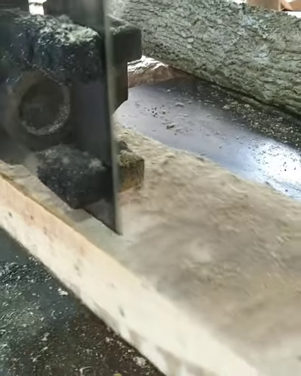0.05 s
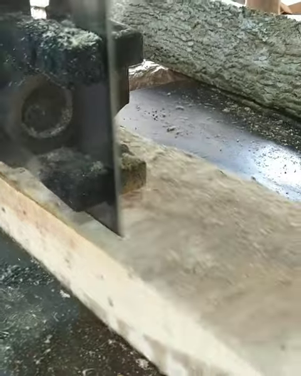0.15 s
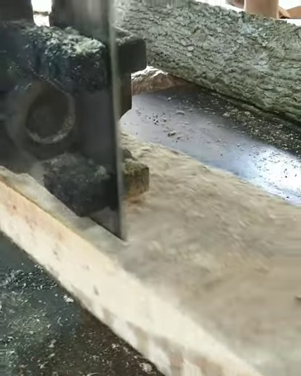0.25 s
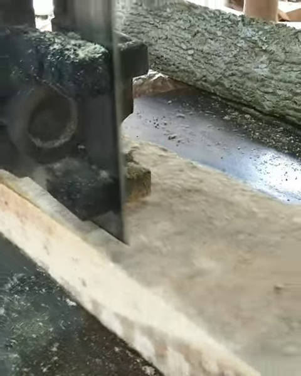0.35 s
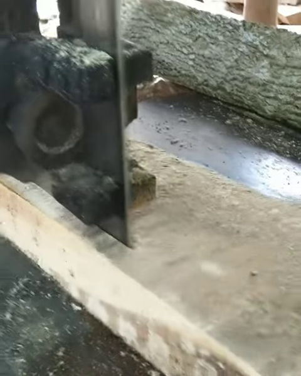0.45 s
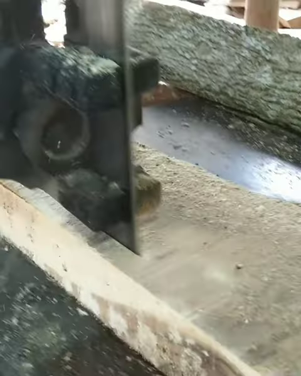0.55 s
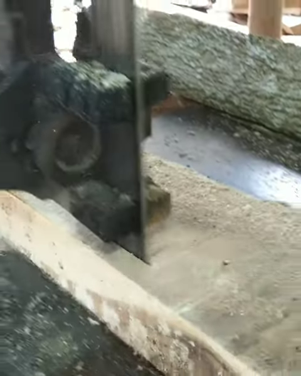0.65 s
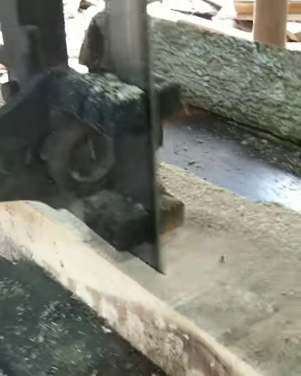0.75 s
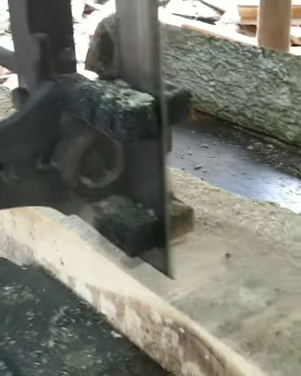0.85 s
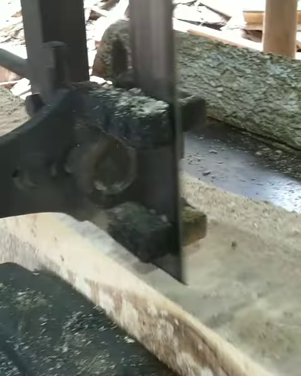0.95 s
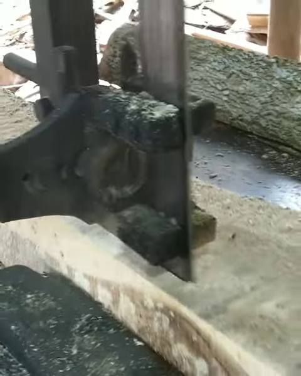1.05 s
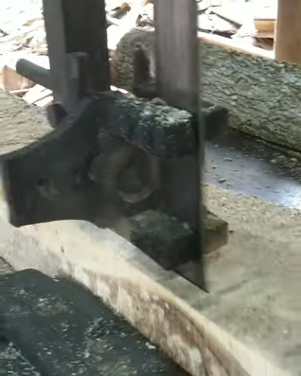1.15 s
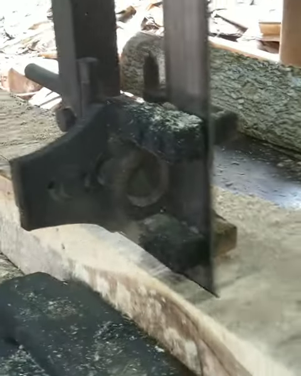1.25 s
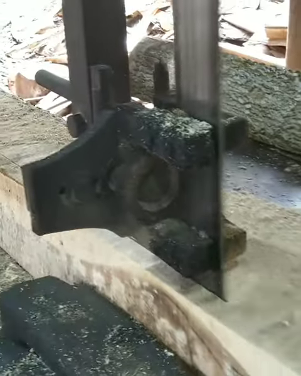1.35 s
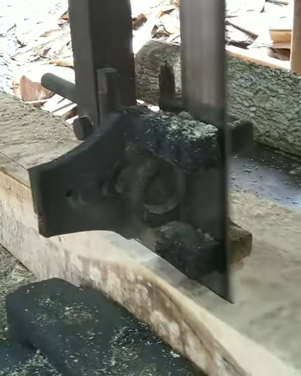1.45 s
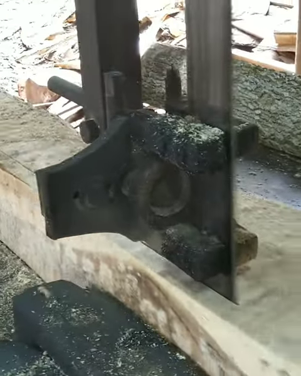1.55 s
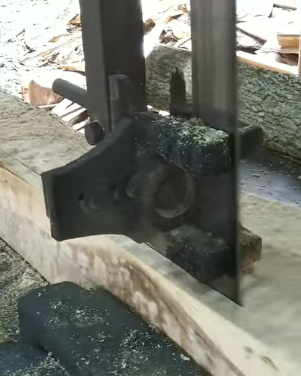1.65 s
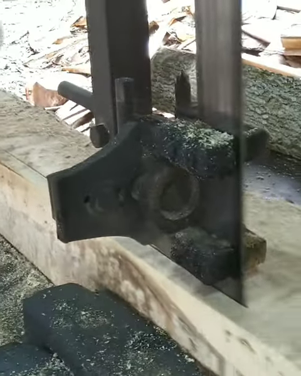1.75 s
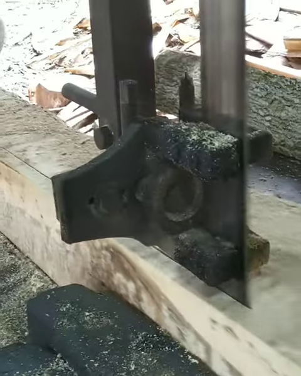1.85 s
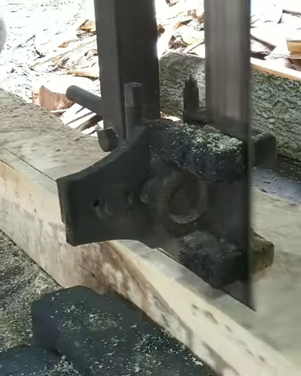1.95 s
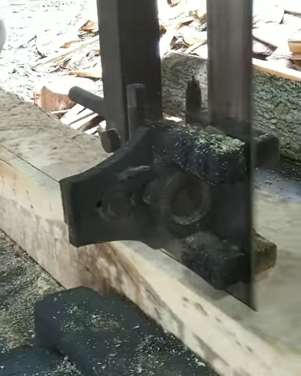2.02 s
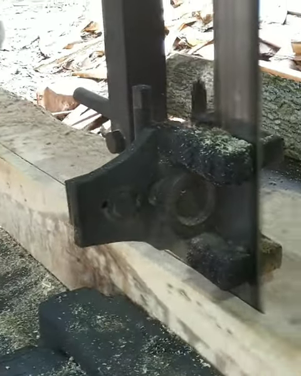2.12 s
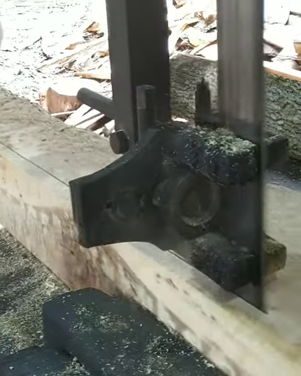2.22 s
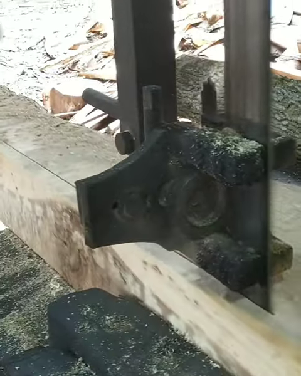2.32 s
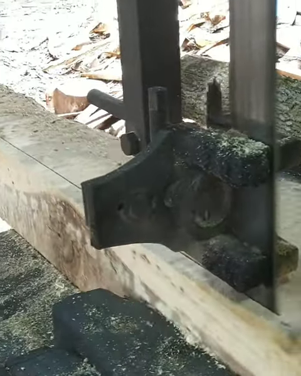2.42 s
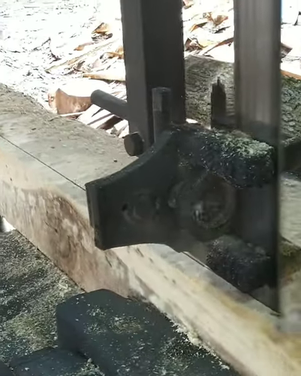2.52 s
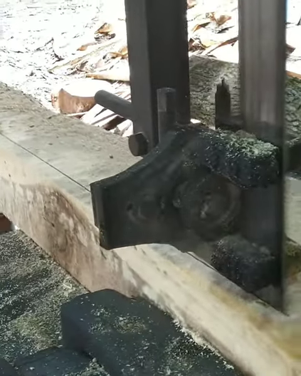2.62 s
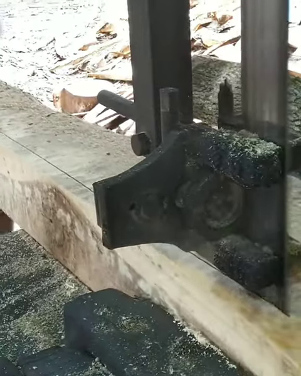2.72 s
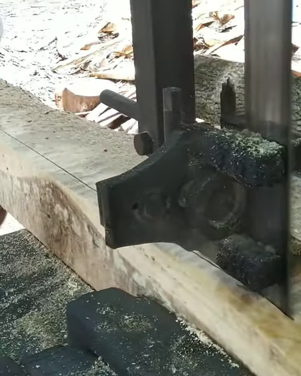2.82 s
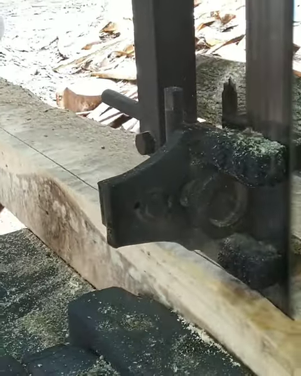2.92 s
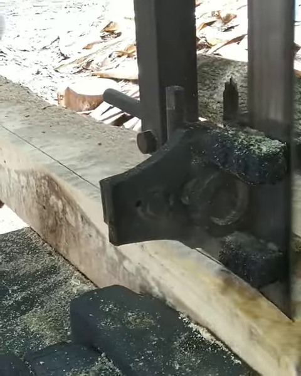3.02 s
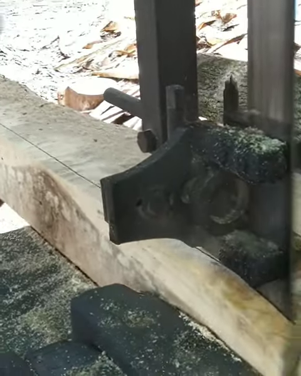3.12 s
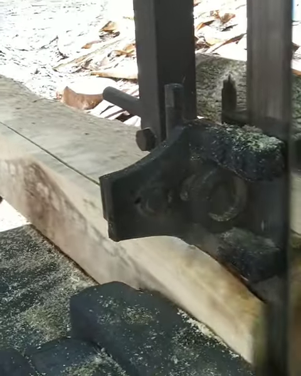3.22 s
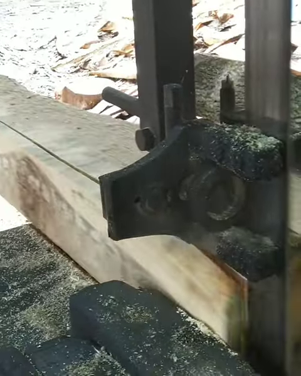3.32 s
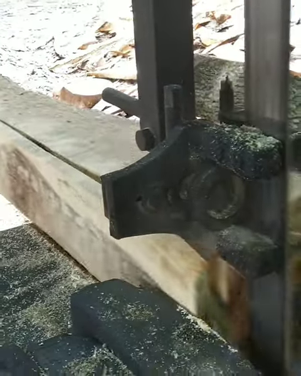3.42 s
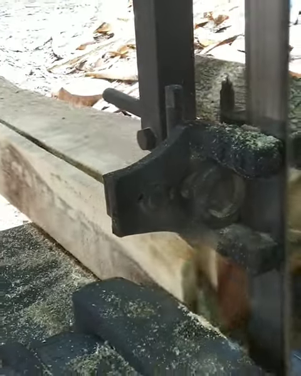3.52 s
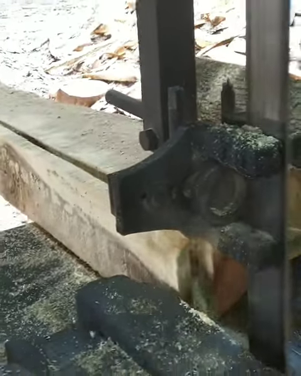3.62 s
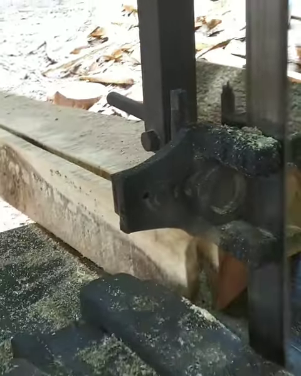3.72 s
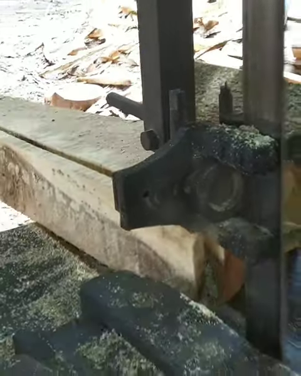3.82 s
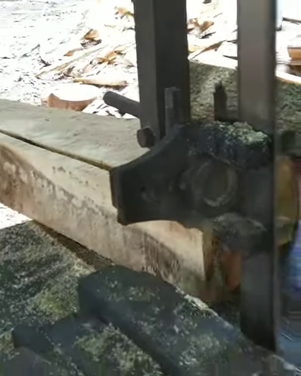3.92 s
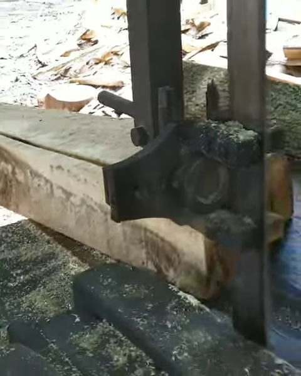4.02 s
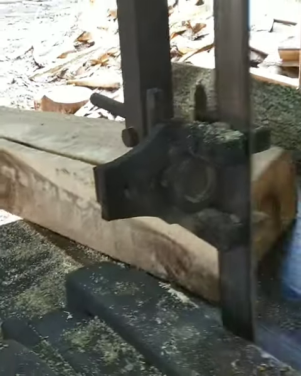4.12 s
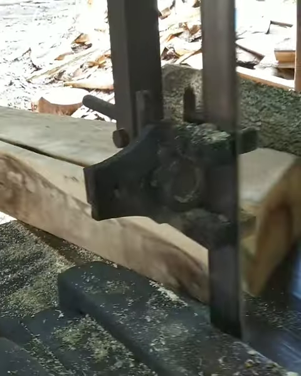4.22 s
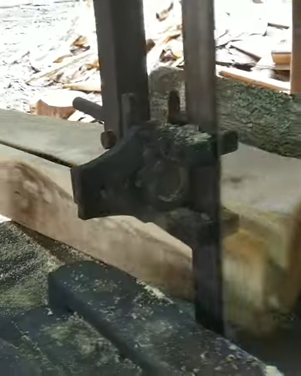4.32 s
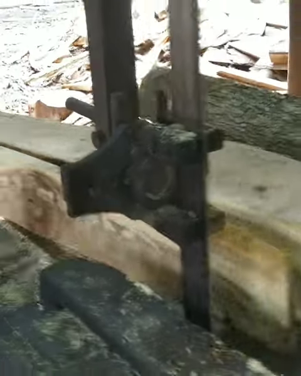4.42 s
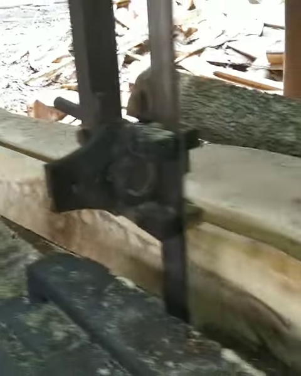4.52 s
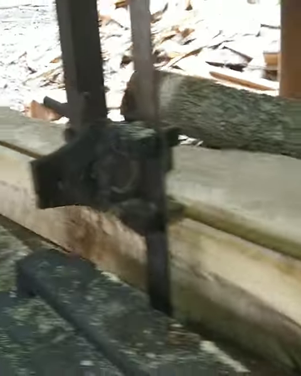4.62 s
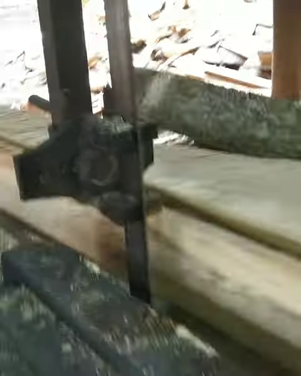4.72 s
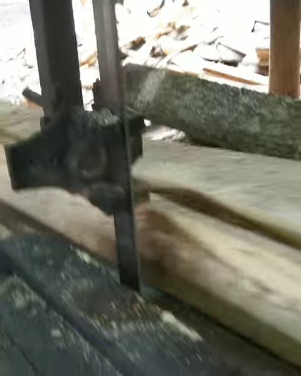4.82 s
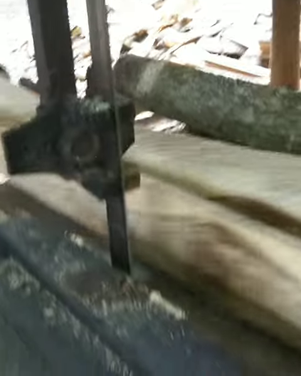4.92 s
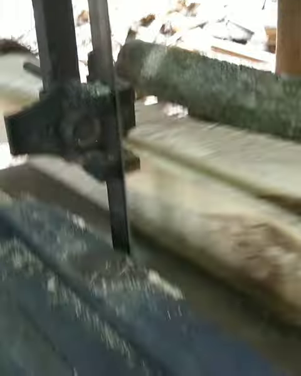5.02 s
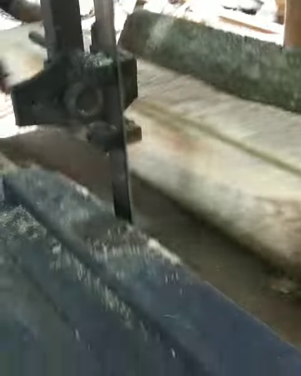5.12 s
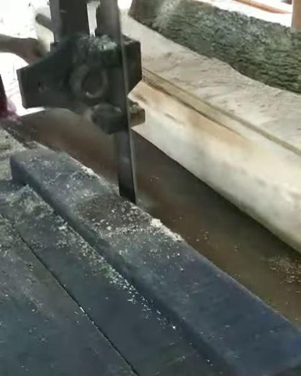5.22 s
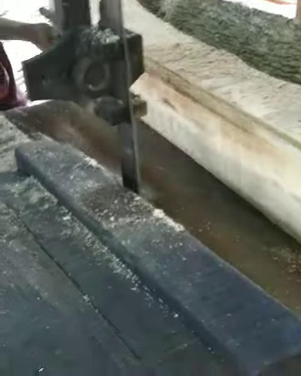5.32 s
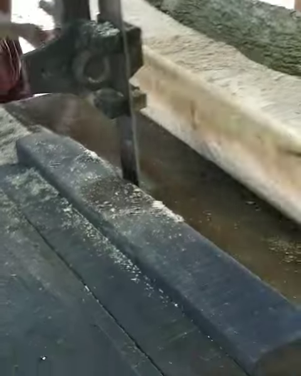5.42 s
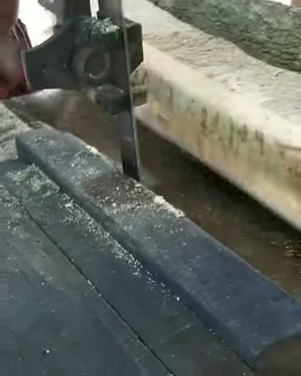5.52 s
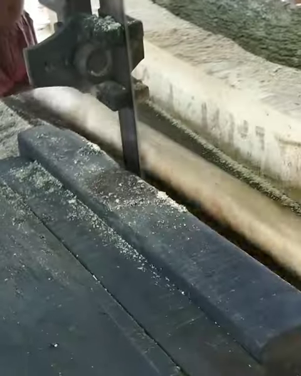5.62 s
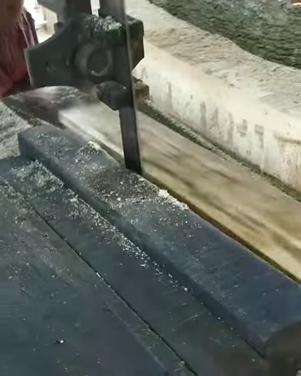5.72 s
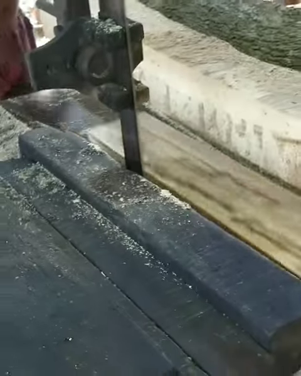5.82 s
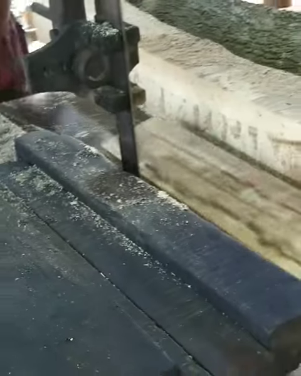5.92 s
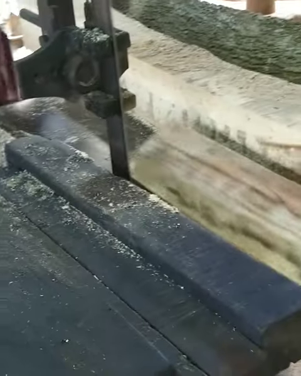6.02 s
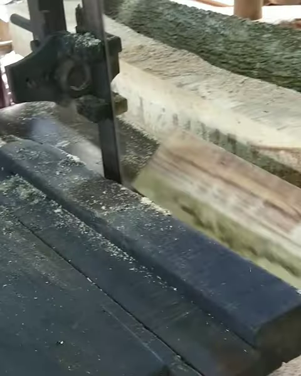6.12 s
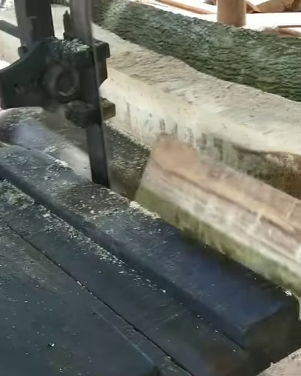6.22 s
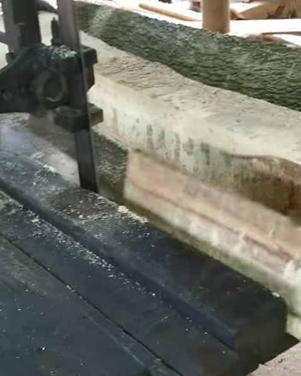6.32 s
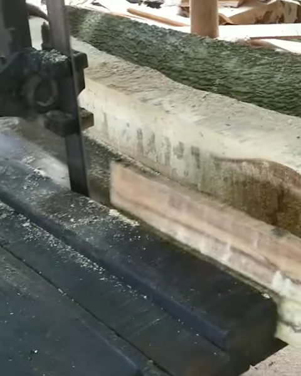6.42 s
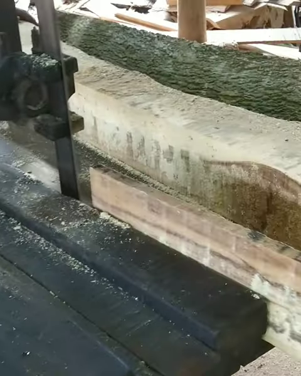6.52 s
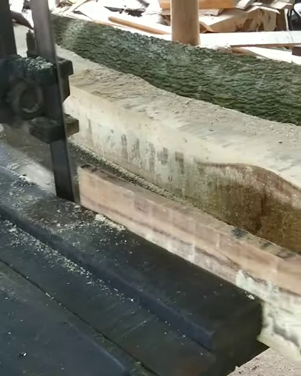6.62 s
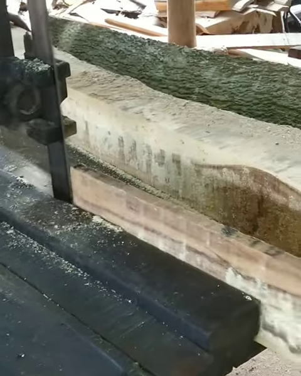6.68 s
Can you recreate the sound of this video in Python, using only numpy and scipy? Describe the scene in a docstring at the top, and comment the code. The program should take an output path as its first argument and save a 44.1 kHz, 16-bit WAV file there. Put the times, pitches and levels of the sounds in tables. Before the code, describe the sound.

Loud, hissing, screeching band saw finishes a cut through a log, air thumping the microphone, then the blade runs free with a steady whirr.

```python
"""First comes the hiss and screech of a big band saw finishing a cut through a log, close to a phone.
Patchy noise, shaped by resonances, makes the teeth and the log's drone; noise pushes and rolls are the air
and chips buffeting the microphone. The blade then leaves the wood and runs free over its wheels, as whirring
noise with thin whines, while the phone draws back. A brief bright scrape comes late.
The bass is mono; the right channel's treble drops out band by band."""
import sys
import numpy as np
from scipy import signal
from scipy.fft import rfft, irfft, next_fast_len
from scipy.io import wavfile
from scipy.ndimage import uniform_filter1d, map_coordinates

SR = 44100
rng = np.random.default_rng(int(sys.argv[2]) if len(sys.argv) > 2 else 0)


def output_pcm(signal):
    """Save a mono or channel-first signal as 16-bit PCM at the path in sys.argv[1].

    Samples are clipped to [-1, 1] before scaling.
    """
    pcm = np.clip(np.atleast_2d(signal).T, -1, 1) * 32767
    wavfile.write(sys.argv[1], SR, np.round(pcm).astype(np.int16))


N = 297675

# How loud the cut is, before its swings: time_s, tooth_hiss_db, log_drone_db
CUT_LEVELS = [(0, -15.5, -30.5), (.7, -17, -32), (1.15, -18, -25), (1.4, -18.5, -30.5), (1.7, -18, -28),
              (2.45, -18, -26), (2.7, -17.5, -26.5), (3.2, -19.5, -29.5)]
# How hard the air hits the microphone: time_s, strength_db
BUFFET_LEVELS = [(0, -23.5), (.9, -23), (1.1, -24), (1.3, -27.5), (1.43, -30.5), (1.5, -27), (1.75, -23.5),
                 (2.6, -25.5), (2.75, -29), (3.0, -30.5), (3.19, -28), (3.22, -42)]
# Broad colour of the teeth in wood: pitch_hz, level_db (per Hz)
TEETH_COLOUR = [(350, -11), (600, -4), (1000, -2.5), (1500, -5), (2400, -10), (3200, -3.5), (5000, -6),
                (6200, -8), (9500, -9), (11500, -3), (15000, -7.5)]
# Broad colour of the free blade: pitch_hz, level_db (per Hz)
WHIRR_COLOUR = [(30, -27), (60, -15), (110, -9.5), (250, -8), (400, -6), (600, -4.5), (1250, 0), (1900, -6),
                (2700, -6), (4500, -0.6), (5500, -6), (6400, -7), (9000, -10.5), (11500, -7), (15500, -9)]
# Broad colour of air on the microphone: pitch_hz, level_db (per Hz)
THUMP_COLOUR = [(22, -14), (35, -11), (55, -0.5), (100, -1.5), (200, -0.5), (350, -3), (550, -5), (900, -7),
                (1500, -20), (2500, -35), (5000, -48)]
# Resonances of the blade under load: pitch_hz, width_hz, lift_db
BLADE_MODES = [(3665, 80, 5.5), (3850, 520, 3.5), (4100, 87, 9), (4600, 86, 4), (6984, 244, 10),
               (7540, 580, 6), (8020, 400, 6), (13300, 1040, 8.5)]
# Resonances of the log: pitch_hz, width_hz, lift_db
LOG_MODES = [(940, 220, 4.5), (1350, 40, 0)]
# Resonances of the free blade in its guides (below 0 a dull spot): pitch_hz, width_hz, lift_db
GUIDE_MODES = [(888, 100, 2.5), (705, 50, 3), (1120, 70, 5), (1245, 90, -5), (1350, 45, 4), (1405, 50, 4),
               (1500, 90, 8), (520, 50, 4), (620, 50, 3), (1600, 60, 4), (1685, 50, 7), (1790, 80, 4),
               (2130, 350, 3), (2620, 250, -2.5), (3120, 200, 2), (3800, 300, 4), (5500, 800, 4.5),
               (6950, 300, 2.5), (7700, 900, 2), (10650, 400, -3), (11300, 800, 1.5), (13000, 900, 4.5)]
# Resonance of the motor: pitch_hz, width_hz, lift_db
MOTOR_MODES = [(159.4, 39, 11)]
# A short scrape of wood: centre_s, level_db, half_length_s
SCUFFS = [(5.732, -29.5, 0.0068)]
# Right port against left (below 0 dB loss it is louder): pitch_hz, likeness (0 to 1), loss_db
PORT_MATCH = [(370, 0.97, 0.5), (493, 0.93, 5.5), (610, 1, 3.5), (1100, 0.93, 1.5), (1470, 0.9, 2),
              (2000, 0.82, 2.5), (2900, 0.98, 2.5), (3250, 1, -1.5), (4500, 1, -0.5), (4670, 1, -0.27),
              (6350, 1, -0.5), (6600, 0.6, 1), (9300, 0.99, 0.5)]
# Right channel, middle bands: lower_edge_hz, mean_lag_rad, wander_rad, changes_per_s
MID_BANDS = [(432, 0.39, 0.68, 11), (545, 1.83, 1.3, 26), (792, 1.42, 1.13, 14), (1060, 0.96, 1.01, 14),
             (1288, 1.43, 0.94, 14), (1446, 2.74, 1.47, 9), (1772, 1.33, 1.2, 14), (2340, 1.98, 1.25, 14),
             (2713, 1.77, 1.47, 14)]
# The hardest pushes of air: start_s, nominal_peak_db, width_ms
HARD_PUSHES = [(0.002, -9, 0.36), (0.025, -10, 0.88), (0.0698, -4.5, 0.79), (0.0764, -7, 0.6),
               (0.114, -9, 0.36), (0.1412, -5.5, 0.6), (0.221, -8, 0.63), (0.2268, -7.5, 0.6),
               (0.2529, -14, 0.62), (0.261, -17, 0.5), (0.2944, -11, 0.7), (0.3617, -7.5, 0.61),
               (0.4066, -8, 0.53), (0.4131, -4.5, 0.42), (0.4183, -8, 0.46), (0.4369, -9.5, 0.45),
               (0.55, -10, 0.8), (0.5601, -8, 0.81), (0.5685, -9, 0.7), (0.5757, -9, 0.5),
               (0.6357, -12.5, 0.48), (0.6528, -9, 0.64), (0.6606, -9, 0.37), (0.6718, -9.0, 0.6),
               (0.681, -8, 0.4), (0.688, -6, 0.6), (0.701, -6, 0.35), (0.7224, -9, 0.54), (0.7434, -8, 0.9),
               (0.7581, -10, 0.46), (0.7808, -8, 0.36), (0.8026, -7.5, 0.57), (0.8115, -8.5, 0.64),
               (0.8721, -9, 1.1), (0.8787, -9.5, 1.2), (0.8856, -10, 0.7), (0.9751, -9, 0.7),
               (0.9865, -12.0, 0.5), (0.9926, -10, 0.6), (1.0197, -3, 0.45), (1.0595, -13, 0.34),
               (1.085, -6, 0.7), (1.1082, -6, 0.84), (1.1595, -9, 0.4), (1.2026, -8, 0.37),
               (1.258, -8, 0.44), (1.5323, -9.5, 0.53), (1.5815, -7, 0.6), (1.6337, -8.5, 0.83),
               (1.671, -10, 0.76), (1.6833, -8, 0.43), (1.688, -10, 0.41), (1.7117, -8, 0.45),
               (1.7176, -5.5, 1.1), (1.7376, -7, 0.5), (1.7444, -5, 0.62), (1.784, -7, 0.8), (1.8, -9, 0.7),
               (1.8245, -6, 0.4), (1.8883, -8, 0.5), (1.9168, -9, 0.57), (1.926, -4.5, 0.6),
               (1.9553, -6, 0.59), (2.0039, -11.0, 0.6), (2.0161, -10, 0.4), (2.0273, -14, 0.7),
               (2.08, -14, 0.67), (2.1214, -9.5, 1.6), (2.1431, -12, 0.65), (2.1548, -14, 0.32),
               (2.1872, -7, 0.39), (2.1973, -10.5, 0.55), (2.2682, -9, 0.46), (2.3377, -10.5, 0.36),
               (2.3626, -9, 0.5), (2.4161, -8.5, 0.47), (2.4245, -4.5, 0.61), (2.435, -12.0, 0.54),
               (2.5692, -7, 0.31), (2.5743, -9, 0.55), (2.5871, -9, 0.8), (2.6236, -11, 0.46),
               (2.7913, -7, 0.76), (2.946, -11, 0.95), (3.0328, -9, 1.2), (3.1438, -10, 0.55),
               (3.1712, -8, 0.52), (3.1776, -7, 0.67)]
# The air lets go for a moment: centre_s, depth_db, half_length_s
AIR_LULLS = [(0.051, 15, 0.0075), (0.091, 13, 0.0048), (0.282, 14, 0.0089), (0.428, 21, 0.0036),
             (0.466, 8, 0.0061), (0.506, 8, 0.019), (0.604, 9.5, 0.017), (0.733, 5, 0.0049),
             (0.957, 10, 0.014), (1.074, 6, .005), (1.184, 8, 0.0088), (1.378, 22, 0.0055),
             (1.52, 9, 0.0084), (1.647, 12, 0.012), (1.755, 16, 0.0052), (1.869, 6, 0.0065),
             (2.069, 9, 0.0091), (2.101, 11, 0.0098), (2.168, 3.5, 0.0064), (2.32, 8, 0.0059),
             (2.396, 6, 0.0052), (2.666, 7, 0.018), (2.779, 8, 0.0054), (2.883, 17, 0.011),
             (3.012, 28, 0.02), (3.114, 3.5, 0.051), (3.158, 4, 0.0058)]
# The low rolls swell, or sink where below 0: centre_s, change_db, half_length_s
ROLL_SWELLS = [(0.226, 2, 0.03), (0.883, 3, 0.014), (0.986, 1, 0.019), (1.113, -1, 0.017),
               (1.316, 8.5, 0.035), (1.742, 2, 0.027), (1.984, 4, 0.024), (2.257, 2, 0.027),
               (2.627, 6, 0.049), (2.818, 9.5, 0.026), (3.037, -1.5, 0.022)]
# The phone draws back: time_s, change_db
PHONE_RETREAT = [(3.3, -0.5), (4.3, -1.7), (5.4, -7), (6.75, -7.5)]
# Right channel, treble bands: lower_edge_hz, loss_db, flicker_db, fade_start_s, fade_length_s, first_lag_rad
TREBLE_BANDS = [(3080, 3, 0.5, 3.42, 0.13, 2.5), (4613, 0, 0.55, 3.4, 0.2, 0),
                (6357, 11, 4, 3.53, .22, 1.5), (8150, 0, 2, 1.58, 0.57, 1.86)]
# Swells of loss, one list per treble band (below 0 the band gets louder): centre_s, extra_loss_db, half_length_s
LOSS_SWELLS = [
    [(.1, 30, 0.032), (.27, 14, 0.032), (.39, 21, 0.033), (.66, 22, 0.036)],
    [(.2, 5.5, 0.83), (.63, 40, 0.095), (1.6, 13, 0.14)],
    [(1.42, -7, 0.025), (2.2, 16, .03), (2.72, 12, .03), (3.12, -3, 0.035)],
    [(.02, 33, 0.059), (.38, 10, 0.088), (.47, 28, 0.035), (1.36, 15.5, 0.048)],
]
# Moves of the lag, one list per treble band: from_s, to_s, move_rad
LAG_MOVES = [
    [(.75, 1.15, -1)],
    [(.45, .75, 4.2), (1.15, 1.7, np.pi - 4.2)],
    [(.3, .75, 3.3)],
    [(.45, .6, -1.7), (.9, 1.1, -1.8), (1.18, 1.22, -1.4), (1.29, 1.33, -1.4)],
]
# Small eddies bunch up: centre_s, lift_db, half_length_s
SMALL_EDDIES = [(2.574, 2, 0.0095), (2.63, 5, .01), (2.8, 9.5, 0.015), (2.915, 7, 0.0072),
                (2.946, 4, 0.0078), (3.033, 4, 0.0098), (3.138, 10.5, 0.0082), (3.177, 5.5, 0.0077)]
# Thin whine of the free blade: time_s, pitch_hz, level_db
HIGH_WHINE = [(3.2, 1355, -35.5), (3.7, 1365, -38), (4.2, 1375, -42.5), (4.6, 1410, -41.5),
              (5.1, 1400, -44), (5.7, 1375, -39.5), (6.1, 1395, -43.5), (6.75, 1380, -47)]
# Lower thin tone of the free blade: time_s, pitch_hz, level_db
LOW_WHINE = [(3.3, 900, -50), (4.2, 862, -43.5), (4.9, 879, -52), (5.5, 909, -45), (6.2, 900, -47),
             (6.75, 885, -54)]

OUT_S, BREAK_S = 3.235, 0.023  # the blade is out of the wood; how long breaking out takes
LULL_IN_DRONE = 0.66  # share of a lull that also hushes the log
ROLL_DB, PUSH_DB = -2.5, -2.5  # slow rolls, and quick pushes between flurries
REBOUND = 4.4  # the swing back lasts this many times longer than the push
WHEEL_HZ = 13.2  # wheel turns a second
WHIRR_DB, FRAME_DB, RING_DB, MOTOR_DB = -29.5, -38, -34, -47.5  # before the retreat and swings
FRAME_FALLS, RING_FALLS, MOTOR_FALLS = 0.81, 0.77, 0.22  # share of the retreat; low sound fills the shed
RING_SETTLES_DB, RING_SETTLES_S = 3, 0.74  # the freed blade rings harder at first
WHINE_WIDTH_HZ = 40
MONO_HZ = 330  # both ports hear the same below this
SILENT_DB = 31  # a treble band that loses this much is gone
TREBLE_END_HZ, TOP_HZ = 13000, 15740  # upper limits of the right channel and of the whole sound


def amp(db):
    """Turn decibels into gain."""
    return 10 ** (np.asarray(db) / 20)


def unit(x):
    """Scale to an rms level of 1."""
    return x / np.sqrt(np.mean(x ** 2) + 1e-20)


def along(points, hz):
    """Read each column after the pitch, on a log pitch axis."""
    f, *cols = np.transpose(points)
    return [np.interp(np.log(hz + 1), np.log(f + 1), c) for c in cols]


def curves(rows):
    """Give one value per sample for each column after the time."""
    s, *cols = np.transpose(rows)
    return [np.interp(np.arange(N) / SR, s, c) for c in cols]


def wobble(rate):
    """A smooth random curve through rate random points a second."""
    points = rng.standard_normal(int(N * rate / SR) + 4)
    return map_coordinates(points, [np.arange(N) * rate / SR])


def bumps(rows):
    """Bell-shaped swells from rows of centre_s, height, half_length_s."""
    t = np.arange(N) / SR
    return sum(height * np.exp(-((t - s) / half) ** 2) for s, height, half in rows)


def ramp(start, length):
    """0 before start, rising to 1 over length seconds."""
    return np.clip((np.arange(N) / SR - start) / length, 0, 1)


def even(x, s):
    """Hold the level of x steady, judged over spans of about s seconds."""
    size = int(s * SR)
    power = uniform_filter1d(uniform_filter1d(x ** 2, size), size)
    return x / np.sqrt(np.abs(power) + 1e-9)


def filtered(x, response):
    """Shape x by a response that depends on frequency."""
    m = next_fast_len(N + 8192)
    return irfft(rfft(x, m) * response(np.fft.rfftfreq(m, 1 / SR)), m)[..., :N]


def causal(gain):
    """The same gain, with the phase of a sound that starts sharply and then dies away."""
    cepstrum = irfft(np.log(gain + 1e-4))
    half = len(cepstrum) // 2
    cepstrum[1:half] *= 2
    cepstrum[half + 1:] = 0
    return np.exp(rfft(cepstrum))


def body(spectrum, modes, lo_hz, hi_hz):
    """A broad colour lifted or lowered at its resonances, between two soft edges."""
    def response(hz):
        lift_db = sum(db / (1 + (2 * (hz - c) / w) ** 2) for c, w, db in modes)
        edges = 1 / (1 + (lo_hz / (hz + 1)) ** 4) / (1 + (hz / hi_hz) ** 4)
        return amp(along(spectrum, hz)[0] + lift_db) * edges
    return response


def rush(response, patchy_db, tall=8, long=4):
    """Two unrelated coloured noises sharing patches of random gain, tall bins by long frames; rms 1."""
    z = signal.stft(rng.standard_normal((2, N)), nperseg=512)[2]
    patches = uniform_filter1d(rng.standard_normal(z.shape[1:]), size=tall, axis=0)
    patches = uniform_filter1d(patches, size=long, axis=1)
    noise = signal.istft(z * amp(patchy_db * unit(patches)), nperseg=512)[1][:, :N]
    return unit(filtered(noise, response))


def turning(times):
    """A swell that repeats a number of times each wheel turn, slightly unsteady."""
    return np.sin(2 * np.pi * times * WHEEL_HZ * np.arange(N) / SR + 0.7 * wobble(2.4))


def in_wood():
    """1 while the teeth bite, falling fast to 0 as the blade breaks out."""
    return 1 - ramp(OUT_S - BREAK_S, BREAK_S)


def cutting():
    """Teeth scrape the wood and ring the blade; the log drones under them. The bite changes with the grain."""
    hiss_db, drone_db = curves(CUT_LEVELS)
    bite = wobble(37.9)
    hiss_db = hiss_db + 0.5 * bite + 0.58 * turning(2.3) + 0.92 * wobble(60)
    hiss = amp(hiss_db) * rush(body(TEETH_COLOUR, BLADE_MODES, 3080, 26000), patchy_db=1.6)
    drone_db = drone_db - LULL_IN_DRONE * bumps(AIR_LULLS)
    drone_db = drone_db + 1.3 * bite + 0.8 * turning(1.8) + 1.2 * wobble(90)
    drone_noise = rush(body(TEETH_COLOUR, LOG_MODES, 940, 2530), patchy_db=3.0, tall=2, long=5)
    return in_wood() * (hiss + amp(drone_db) * drone_noise)


def buffet():
    """Small eddies hit the microphone as uneven quick pushes; big ones roll under them, both in flurries."""
    air_db = curves(BUFFET_LEVELS)[0] - bumps(AIR_LULLS)
    roll_db = air_db + ROLL_DB + bumps(ROLL_SWELLS)
    push_db = air_db + PUSH_DB + bumps(SMALL_EDDIES)

    def big_share(hz):
        return 1 / (1 + (hz / 170) ** 4)

    def thump(hz):
        return amp(along(THUMP_COLOUR, hz)[0])

    struck = rng.random((2, N)) < 340 / SR  # about 340 hits a second
    hits = struck * rng.standard_normal((2, N)) * amp(rng.exponential(size=(2, N)))
    pushes = unit(filtered(hits, lambda hz: causal(thump(hz) * (1 - big_share(hz)))))
    rolls = rush(lambda hz: thump(hz) * big_share(hz), patchy_db=1.5)
    flurry = wobble(45.05)
    pushes = even(amp(0.75 * flurry) * pushes, 0.062)
    rolls = even(amp(2.6 * flurry) * rolls, 0.061)
    return in_wood() * (amp(push_db) * pushes + amp(roll_db) * rolls)


def whine(rows):
    """A narrow band of noise around a slowly drifting pitch."""
    hz, db = curves(rows)
    phase = 2 * np.pi * np.cumsum(hz) / SR
    noise = rng.standard_normal((2, 2, N))
    fuzz = filtered(noise, lambda f: 1 / (1 + (f / WHINE_WIDTH_HZ) ** 2))
    return amp(db) * even(np.cos(phase) * fuzz[0] + np.sin(phase) * fuzz[1], 0.067)


def running():
    """The blade whirrs and rings in its guides, swelling with the wheels, over frame drone and motor hum."""
    retreat_db = curves(PHONE_RETREAT)[0]
    turn = turning(1) + 1.2 * turning(2)

    whirr_db = WHIRR_DB + retreat_db + 0.57 * turn + 0.69 * wobble(40)
    whirr = amp(whirr_db) * rush(body(WHIRR_COLOUR, GUIDE_MODES, 2750, 36000), patchy_db=1.5)

    # Narrow, long patches make each resonance of the ring and frame wax and wane
    ring_db = RING_DB + RING_FALLS * retreat_db + RING_SETTLES_DB * (1 - ramp(OUT_S, RING_SETTLES_S))
    ring_db = ring_db + 0.72 * turn + 0.57 * wobble(25)
    ring_noise = rush(body(WHIRR_COLOUR, GUIDE_MODES, 920, 3700), patchy_db=1.5, tall=1, long=40)
    ringing = amp(ring_db) * ring_noise + whine(HIGH_WHINE) + whine(LOW_WHINE)
    ringing = amp(-5 * in_wood()) * ringing  # the wood damps the ring

    frame_db = FRAME_DB + FRAME_FALLS * retreat_db + wobble(25)
    frame_noise = rush(body(WHIRR_COLOUR, GUIDE_MODES, 470, 1100), patchy_db=2.0, tall=1, long=40)

    motor_db = MOTOR_DB + MOTOR_FALLS * retreat_db + 0.21 * wobble(7.7)
    motor = amp(motor_db) * rush(body(WHIRR_COLOUR, MOTOR_MODES, 15, 446), patchy_db=1.0)
    return whirr + ringing + amp(frame_db) * frame_noise + motor


def slaps():
    """Each hard push is a steep jump of pressure, in or out, and a slower swing back."""
    out = np.zeros(N + SR)
    t = np.arange(SR // 20) / SR
    for (s, db, ms), way in zip(HARD_PUSHES, rng.random(len(HARD_PUSHES))):
        u = 2.42 * t * 1000 / ms
        swing = u * (np.exp(1 - u) - np.exp(1 - u / REBOUND) / REBOUND ** 2)
        out[round(s * SR):][:len(t)] += amp(db) * np.sign(way - .5) * swing
    return out[:N]


def scuff():
    """A brief bright scrape of noise that swells and fades."""
    swell = bumps([(s, amp(db), half) for s, db, half in SCUFFS])
    return swell * rush(body(WHIRR_COLOUR, [], 2500, 30000), patchy_db=-1.0)


def scene():
    """All sounds at two ports; above the bass the right one differs in level and has an unrelated share."""
    pair = cutting() + buffet() + running() + slaps() + scuff()
    pair = pair / (1 + np.abs(pair / 0.9) ** 4) ** (1 / 4)  # the capsule rounds off the loudest pushes

    def ports(hz):
        alike, loss_db = along(PORT_MATCH, hz)
        alike = np.where(hz < MONO_HZ, 1, np.clip(alike, 0, 1))
        return amp(-loss_db * (hz > MONO_HZ)) * np.array([alike, np.sqrt(1 - alike ** 2)])

    return np.array([pair[0], filtered(pair, ports).sum(axis=0)])


def late(x, lo, hi, lag):
    """The band lo to hi Hz of x, its phase held back by lag radians."""
    def plain_and_quarter(hz):
        return ((hz >= lo) & (hz < hi)) * np.array([[1], [-1j]])

    plain, quarter = filtered(x, plain_and_quarter)
    return np.cos(lag) * plain + np.sin(lag) * quarter


def record(dry):
    """The right channel's bands shift in phase; its treble varies in level and fades out; the top is cut."""
    edges = [row[0] for row in MID_BANDS + TREBLE_BANDS] + [TREBLE_END_HZ]
    lags = [lag + wander * wobble(rate) for _, lag, wander, rate in MID_BANDS]
    gains = [1] * len(MID_BANDS)
    for band, swells, moves in zip(TREBLE_BANDS, LOSS_SWELLS, LAG_MOVES):
        _, loss_db, flicker_db, fade_s, lasts_s, lag = band
        lost_db = loss_db + flicker_db * np.abs(wobble(22)) + bumps(swells)
        lost_db = lost_db + SILENT_DB * ramp(fade_s, lasts_s) ** 1.07
        # The last 8 dB before silence also fade straight to nothing
        gains.append(amp(-lost_db) * np.clip((SILENT_DB - lost_db) / 8, 0, 1))
        lags.append(lag + sum(rad * ramp(a, b - a) for a, b, rad in moves))
    right = late(dry[1], 0, edges[0], 0)
    for lo, hi, lag, gain in zip(edges, edges[1:], lags, gains):
        right = right + gain * late(dry[1], lo, hi, lag)
    return filtered(np.array([dry[0], right]), lambda hz: hz < TOP_HZ)


dry = scene()
out = record(dry)
output_pcm(out)
```